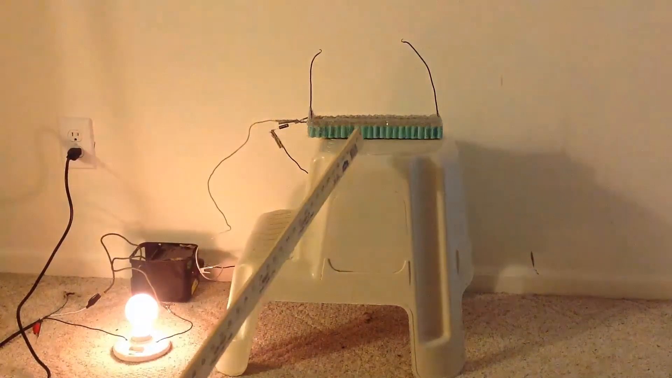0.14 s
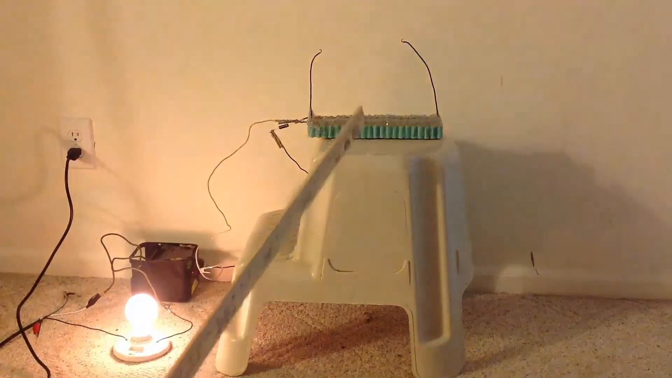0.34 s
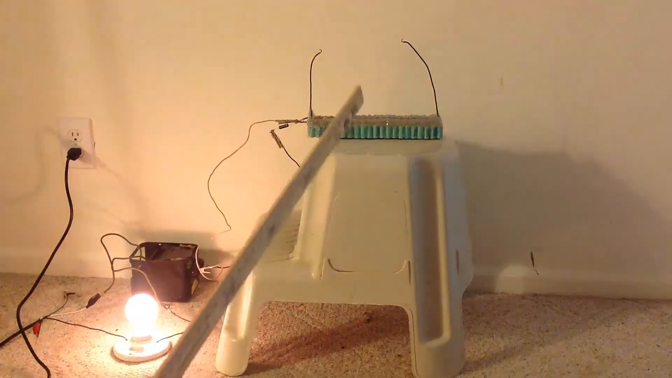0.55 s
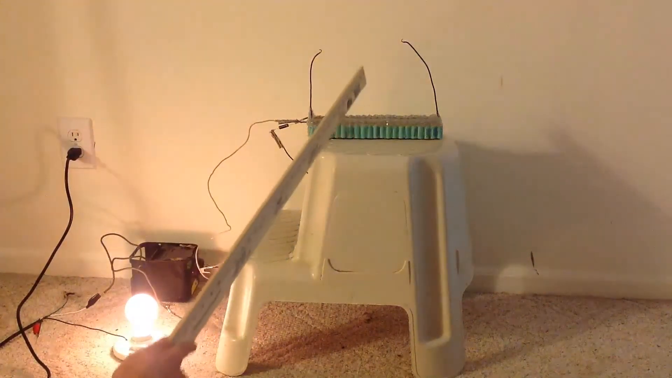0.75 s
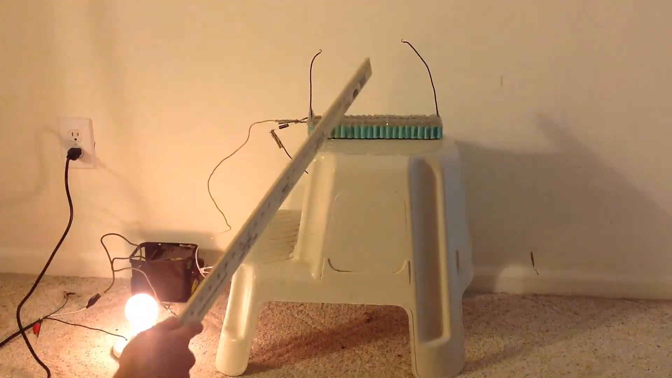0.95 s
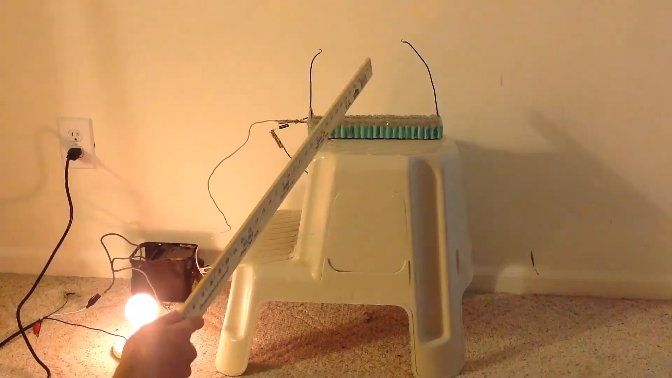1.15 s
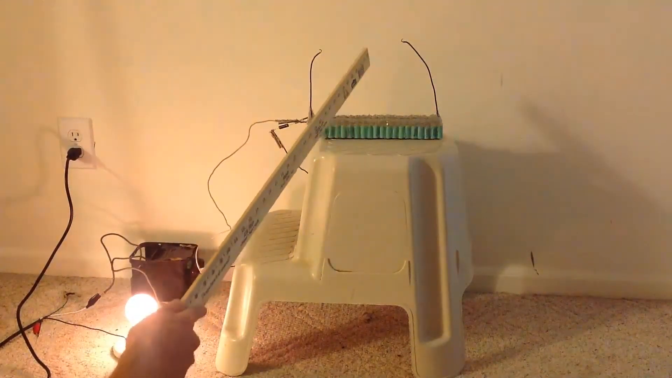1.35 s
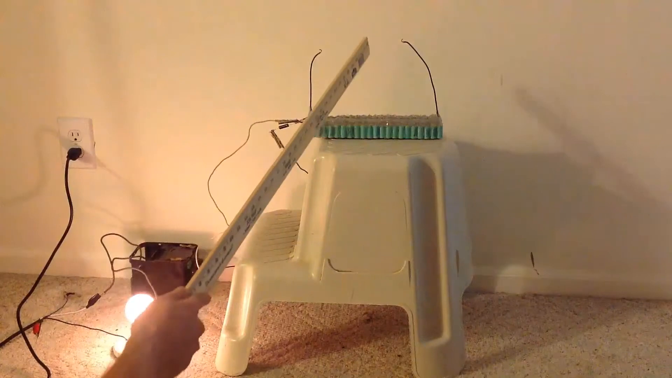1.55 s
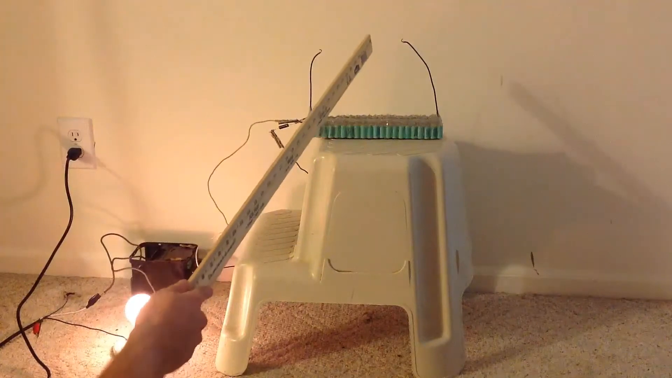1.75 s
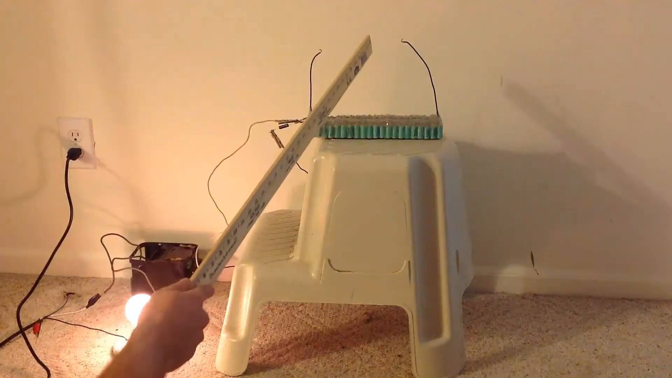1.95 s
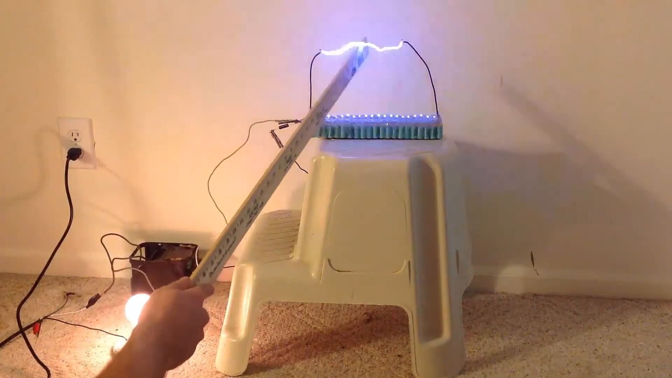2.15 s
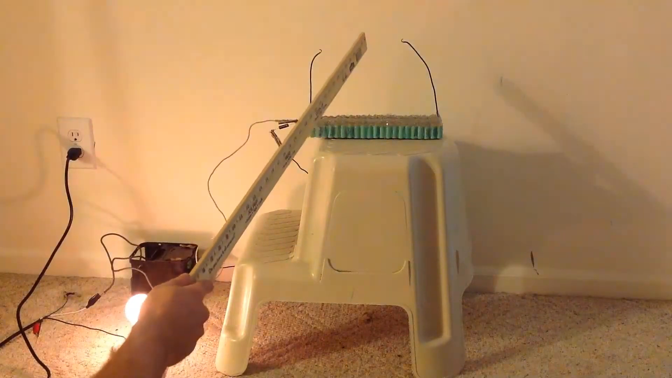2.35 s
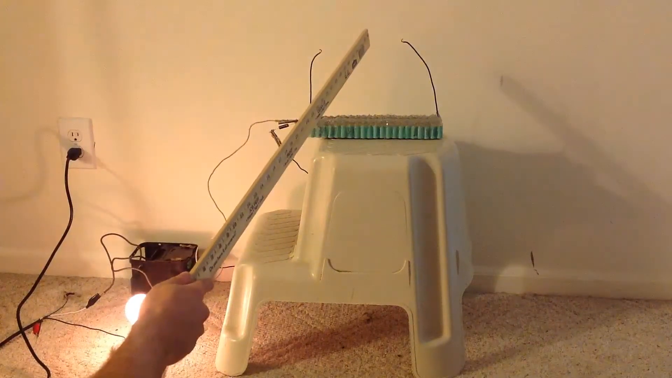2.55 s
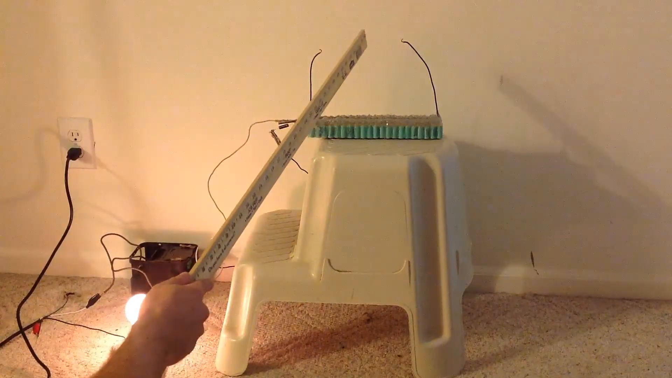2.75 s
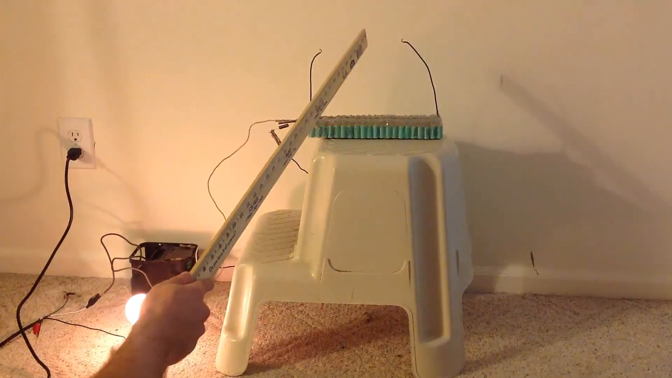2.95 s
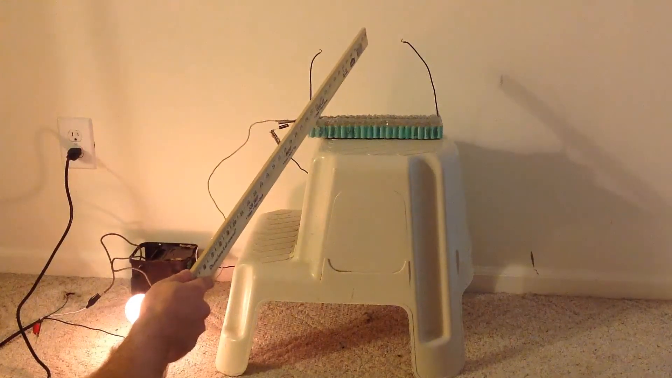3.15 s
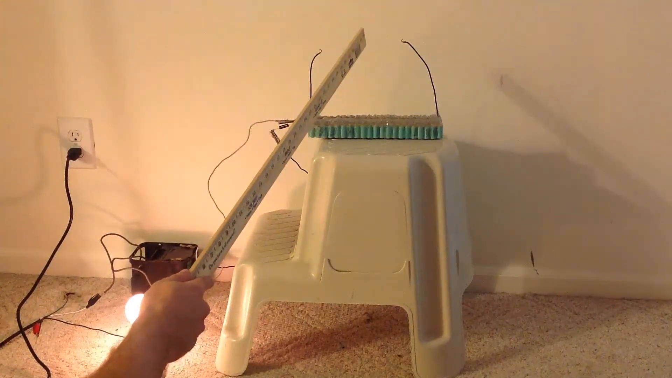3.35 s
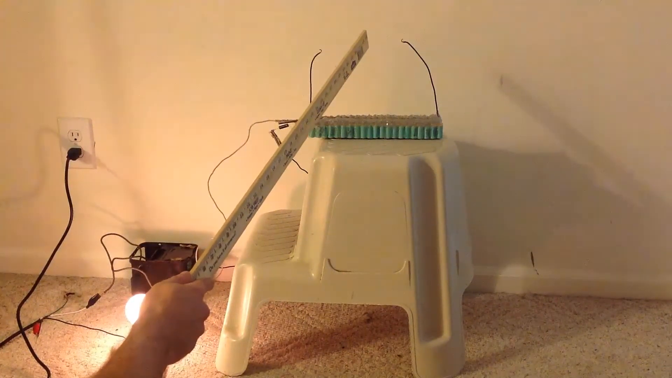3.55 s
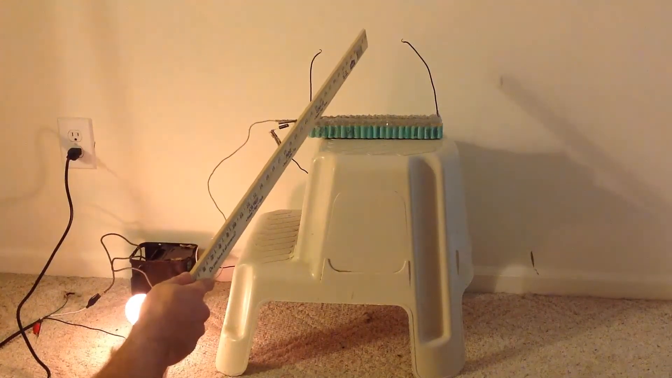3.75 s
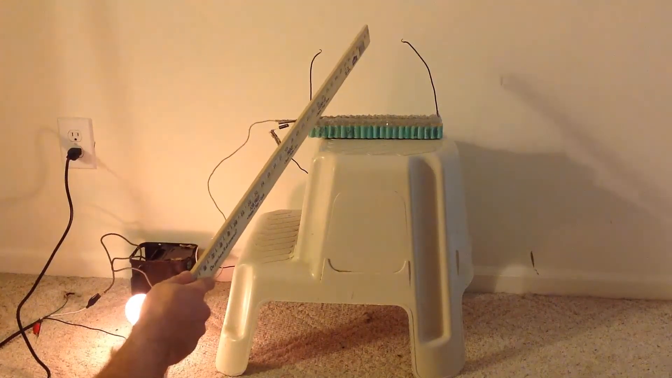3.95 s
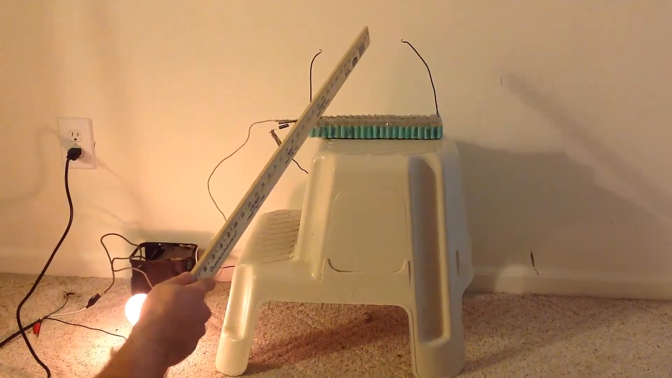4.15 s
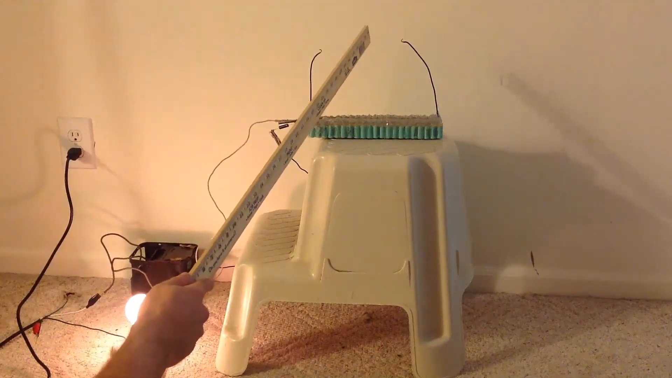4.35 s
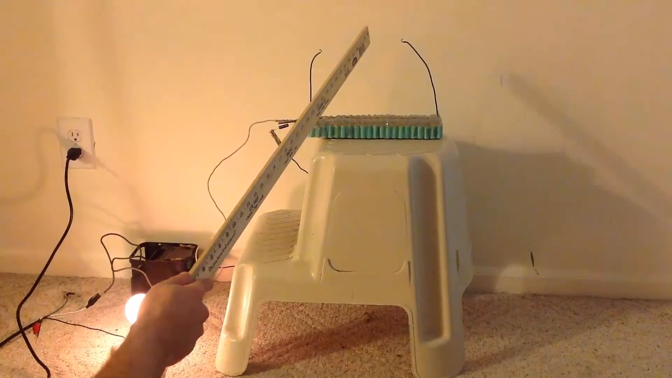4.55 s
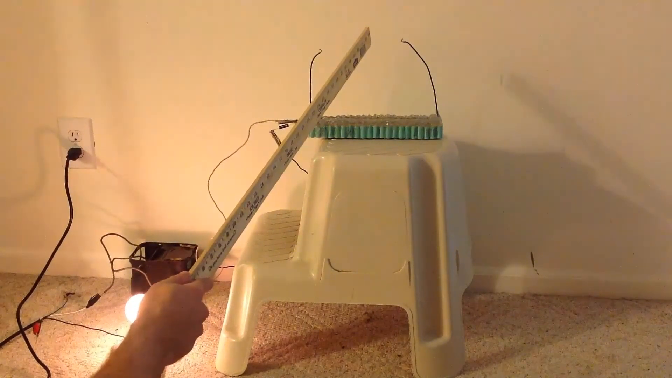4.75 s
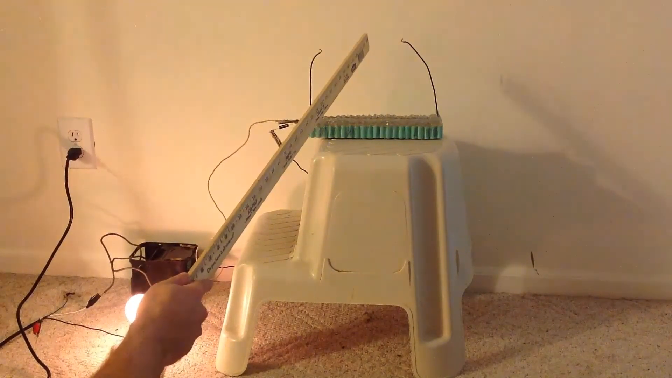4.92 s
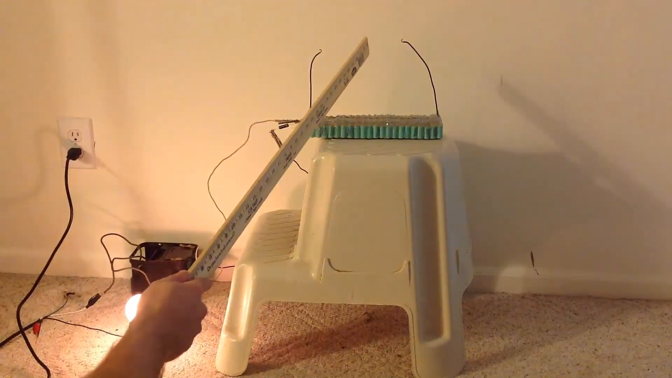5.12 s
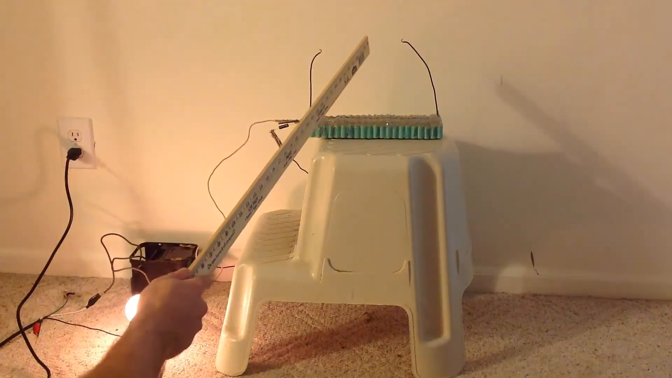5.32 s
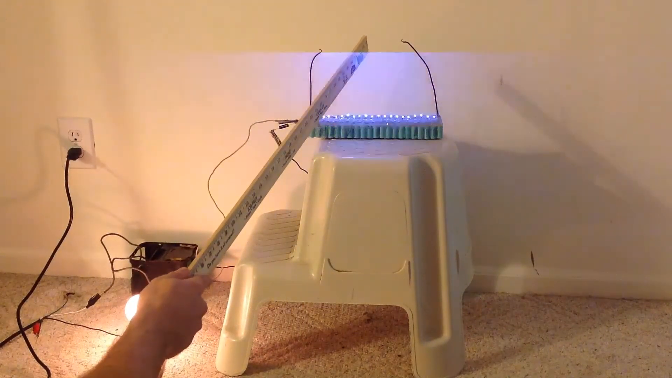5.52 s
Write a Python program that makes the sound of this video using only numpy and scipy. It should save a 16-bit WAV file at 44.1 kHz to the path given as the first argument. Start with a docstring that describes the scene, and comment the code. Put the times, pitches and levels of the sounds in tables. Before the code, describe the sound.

A homemade high-voltage generator fires five loud, sharp spark cracks across an air gap, about one a second. Each overloads a small microphone with a thump and leaves quick echoes and a short, bright tail in a small hard-walled room. Faint mains hum and hiss lie underneath, dipping after every crack and creeping back. Something creaks very faintly between the first two cracks.

```python
"""A home-made high-voltage generator sparks across its air gap in a small hard-walled room.
First one spark's tail dies into mains hum and room noise; then the gap fires about once a second.
Each shock overloads a small microphone into a thump, returns from the walls as sharp echoes and
decays as a bright tail, while gain control ducks the background and slowly releases it.
Between the first two cracks something creaks faintly, once."""
import sys
import numpy as np
from scipy import signal
from scipy.fft import rfft, irfft
from scipy.io import wavfile
from scipy.ndimage import uniform_filter1d

SR = 44100
rng = np.random.default_rng(int(sys.argv[2]) if len(sys.argv) > 2 else 0)


def wav_out(sig):
    """Save sig, one row per channel (or a flat mono array), as 16-bit PCM at SR to the path in sys.argv[1]."""
    wavfile.write(sys.argv[1], SR, np.round(np.clip(np.atleast_2d(sig).T, -1, 1) * 32767).astype(np.int16))


N = 250488
TIME = np.arange(N) / SR

# Levels in all tables are relative.
# discharges: (time [s], strength [dB], push of the echoes [dB], direct slap [dB], reverberation [dB])
DISCHARGES = [(-0.1095, 9, 3, -18, 0), (1.0576, 2, 0.5, -9, 0), (2.1939, -1.5, -2.5, -14.5, 1.4),
              (3.31, 10, 1, 3.5, -.5), (4.5103, 7, 3.5, 0.5, 0.8), (5.596, 2, -8, 10, -1)]
# reflections from the near walls: (delay [s])
NEAR_WALL_DELAYS = [.0064, .0104, .021]
# clearest reflections from the far walls: (delay [s])
FAR_WALL_DELAYS = [.038, .061, .158, .1695]
# spectrum of the diffuse tail: (frequency [Hz], spectral level [dB])
TAIL_SPECTRUM = [(100, -19), (200, -3.5), (400, -4), (800, -8.5), (1300, -7), (2500, -2), (4000, -3),
                 (7000, 0.5), (11000, 5), (15000, 3.5)]
# reverberation time of the room: (frequency [Hz], time to fall 60 dB [s])
ROOM_T60 = [(150, 0.14), (550, 0.27), (850, 0.47), (2500, 0.45), (4500, 0.55), (8000, 0.44), (11000, 0.35),
            (14000, 0.3)]
# resonances that stand out of the tail: (frequency [Hz], level [dB])
ROOM_MODES = [(802, -37.5), (847, -38.5), (971, -43.5), (1437, -43), (1601, -38.5), (2333, -42),
              (2780, -37), (3014, -39), (3469, -41.5), (3636, -32), (4250, -34.5), (4546, -34), (4789, -37),
              (5300, -32.5), (5797, -35.5), (6867, -34.5), (7193, -37.5)]
# swells of the creak's low note: (start time [s], level [dB])
CREAK_SWELLS = [(1.632, -45), (1.684, -42.5)]
# modes of the creak's rasp: (frequency [Hz], level [dB], time to fall 60 dB [s])
RASP_MODES = [(3110, 19, 0.014), (3840, 9, 0.041), (3900, 0, .03)]
# spectral lines of the mains and a small motor: (frequency [Hz], level [dB])
HUM_LINES = [(96.9, -77), (242.2, -63.5), (279.9, -76.5), (360.7, -70.5), (457.6, -85), (554.5, -66.5),
             (646.0, -68), (834.4, -69), (952.8, -73.5), (1114, -70), (1389, -78)]
# room noise and microphone hiss: (frequency [Hz], spectral level [dB])
NOISE_SPECTRUM = [(40, -30.5), (70, -14), (110, -8.5), (160, -2.5), (250, -2), (420, -7.5), (640, -6),
                  (780, -9.5), (1200, -12), (1800, -13.5), (4000, -18), (8000, -21.5), (15000, -22)]


def sparks(shared_power=0.63, crack_db=9.5, thump_db=9, tail_db=-1.5, ring_db=4):
    """Superposition of shock, overload and room response; fixed geometry makes the tails largely alike."""
    t, out = np.arange(int(.7 * SR)) / SR, np.zeros(N)
    common, *own_tails = [diffuse_tail(t) for _ in range(len(DISCHARGES) + 1)]
    direct_slap = from_db(-2) * slap(t, start_hz=850, end_hz=270, glide_s=.0016, decay_s=.0026)
    wall_slap = from_db(-1.5) * slap(t, start_hz=2000, end_hz=320, glide_s=.0005, decay_s=.0012)
    far = far_paths()
    for (s, strength_db, echo_db, slap_db, reverb_db), own in zip(DISCHARGES, own_tails):
        crack = shocks(t, near_paths(), decay_s=.00042, low_hz=503, high_hz=18100)
        crack *= from_db(crack_db + .49 * strength_db)  # grows more slowly than the thump
        low = from_db(thump_db + strength_db) * thump(t, echo_db)
        # the shape of each spark channel changes part of the tail
        tail = np.sqrt(shared_power) * common + np.sqrt(1 - shared_power) * own
        room = from_db(tail_db) * surface_comb(tail) + from_db(ring_db) * room_ringing(t)
        ticks = shocks(t, far, decay_s=.0002, low_hz=5000, high_hz=11000)  # far echoes return thin
        add(out, s, crack + low + from_db(slap_db) * direct_slap + from_db(reverb_db) * room + ticks)
        add(out, s + NEAR_WALL_DELAYS[0], from_db(1.4 * echo_db) * wall_slap)
    return out


def shocks(t, paths, decay_s, low_hz, high_hz):
    """Multipath propagation: the crooked spark channel sends a short, ragged shock along each path."""
    out, short = np.zeros(len(t)), t[:128]
    for delay, db in paths:
        shock = rng.standard_normal(len(short)) * np.exp(-short / decay_s)
        shock = butter(butter(shock, low_hz, "high", order=1), high_hz, "low")
        add(out, delay, from_db(db) * shock / np.linalg.norm(shock))
    return out


def thump(t, echo_db, recover_s=.00044, bright_hz=1200, coupling_hz=135, leak_db=-23.5):
    """High-pass transient: shocks push the microphone off centre and its bass cut swings it back."""
    pushes = np.zeros(len(t))
    for delay, db in wall_paths():
        push_db = 1.2 * db + (echo_db if delay else 0)  # overload grows faster than the arrival
        add(pushes, delay, from_db(push_db) * np.exp(-t / recover_s))
    pushes = butter(pushes, bright_hz, "low", order=1)
    return butter(pushes, coupling_hz, "high", order=6) + from_db(leak_db) * pushes


def slap(t, start_hz, end_hz, glide_s, decay_s):
    """Damped oscillation: the overloaded microphone swings a cycle or two, slower as it recovers."""
    hz = end_hz + (start_hz - end_hz) * np.exp(-t / glide_s)
    return np.cos(2 * np.pi * np.cumsum(hz) / SR) * np.exp(-t / decay_s)


def wall_paths(distance_m=2, sound_m_per_s=343):
    """Spherical spreading: direct and wall paths weaken as 1 / distance; (delay [s], level [dB])."""
    delays = [0, *NEAR_WALL_DELAYS]
    return [(delay, -20 * np.log10(1 + delay * sound_m_per_s / distance_m)) for delay in delays]


def near_paths(level_db=14, bounce_s=.0014, bounce_db=-4):
    """Image source: a surface right by the gap doubles every arrival; (delay [s], level [dB])."""
    pair = [(0, level_db), (bounce_s, level_db + bounce_db)]
    return [(delay + lag, db + pair_db) for delay, db in wall_paths() for lag, pair_db in pair]


def far_paths(level_db=10.5, loss_db_per_s=79, stray_db=-5.5):
    """Propagation loss: clear and stray far echoes weaken with delay; (delay [s], level [dB])."""
    clear = [(delay, 0) for delay in FAR_WALL_DELAYS]
    stray = [(delay, stray_db) for delay in rng.uniform(.062, .24, 5)]
    return [(delay, level_db + db - loss_db_per_s * delay) for delay, db in clear + stray]


def diffuse_tail(t, grain_db=3, build_s=.008):
    """Reverberation: countless uneven reflections build up, then each band decays at its own rate."""
    edges_hz = np.geomspace(80, 17000, 21)
    reflections = rng.standard_normal((2, len(t)))
    reflections *= from_db(grain_db * rng.standard_normal(len(t) // 8 + 1)).repeat(8)[:len(t)]
    undamped, tail = 0, 0
    for k, (low, high) in enumerate(zip(edges_hz, edges_hz[1:])):
        hz = np.sqrt(low * high)
        band = from_db(at_hz(TAIL_SPECTRUM, hz)) * butter(reflections[k % 2], [low, high], "band")
        undamped += band
        tail += band * from_db(-60 * t / at_hz(ROOM_T60, hz))
    return tail / np.std(undamped) * (1 - np.exp(-t / build_s))


def surface_comb(tail, reflection=.092):
    """Comb filtering: the stool and the wall behind the gap mirror the spark into spectral ripples."""
    mirrors = np.zeros(SR // 50)
    mirrors[0] = 1
    for delay, _ in near_paths()[1:4]:
        mirrors[round(delay * SR)] += reflection
    return signal.fftconvolve(tail, mirrors / np.linalg.norm(mirrors))[:len(tail)]


def room_ringing(t, scatter_db=6, spread_hz=20):
    """Beating: each resonance is three close, decaying modes that every spark excites differently."""
    out = np.zeros(len(t))
    for centre_hz, db in ROOM_MODES:
        hz = centre_hz + spread_hz * rng.uniform(-1, 1, (3, 1))
        size, phase = from_db(scatter_db * rng.standard_normal(hz.shape)), rng.random(hz.shape)
        cluster = (size * np.sin(2 * np.pi * (hz * t + phase))).sum(axis=0) / np.sqrt(len(hz))
        out += cluster * from_db(db - 60 * t / at_hz(ROOM_T60, centre_hz))
    return out


def creak(note_hz=330, slips_per_s=250, rasp_at_s=1.677, rasp_width_s=.02, rasp_db=-67):
    """Stick-slip excitation: a brief run of slips rings three high modes over a soft low note."""
    envelope = sum(from_db(db) * swell(s, rise_s=.014) for s, db in CREAK_SWELLS)
    note = envelope * np.sin(2 * np.pi * note_hz * TIME + drift(60))
    slip_rate = slips_per_s * from_db(2 * drift(90))
    slips = np.diff(np.floor(np.cumsum(slip_rate) / SR), prepend=0)  # one impulse per slip
    slips *= np.exp(-((TIME - rasp_at_s) / rasp_width_s) ** 2)
    t = TIME[:SR // 10]
    body = sum(from_db(db - 60 * t / t60) * np.sin(2 * np.pi * hz * t) for hz, db, t60 in RASP_MODES)
    return note + from_db(rasp_db) * signal.fftconvolve(slips, body)[:N]


def hum(gain_db=2.5, waver_rad=.5):
    """Line spectrum: the mains and a small motor give tones that waver slightly in level and phase."""
    out = np.zeros(N)
    for hz, db in HUM_LINES:
        amplitude = np.sqrt(2) * from_db(gain_db + db + drift(15))
        out += amplitude * np.sin(2 * np.pi * (hz * TIME + rng.random()) + waver_rad * drift(16))
    return out


def room_noise(level_db=-52.5, bass_cut_hz=85):
    """Stationary noise: room sound and microphone hiss form a continuous spectrum without deep bass."""
    hz = np.maximum(np.arange(N // 2 + 1) * SR / N, 1)
    spectrum = rfft(rng.standard_normal(N)) * from_db(at_hz(NOISE_SPECTRUM, hz))
    noise = butter(irfft(spectrum, N), bass_cut_hz, "high")
    return from_db(level_db) * noise / np.sqrt(np.mean(noise ** 2))


def gain_control(x, threshold_db=-36, depth_db=8.5, release_db_per_s=7.5, attack_s=.013):
    """Compression: loud sound quickly lowers the gain by a limited amount; it creeps back up."""
    power = uniform_filter1d(x[0] ** 2, size=220, origin=109)  # mean of the past 5 ms
    level_db = 10 * np.log10(np.maximum(power, 1e-12))
    wanted_db = np.clip(level_db - threshold_db, 0, depth_db)
    release_db = release_db_per_s * TIME
    held_db = np.maximum.accumulate(wanted_db + release_db) - release_db
    pole = np.exp(-1 / (attack_s * SR))
    cut_db, _ = signal.lfilter([1 - pole], [1, -pole], held_db, zi=[pole * held_db[0]])
    return x * from_db(-cut_db)


def swell(s, rise_s):
    """Critically damped envelope: rises from time s to 1, then dies away."""
    age = np.maximum(TIME - s, 0) / rise_s
    return age * np.exp(1 - age)


def drift(rate_hz):
    """Random modulation: a slow wander with a spread of about 1."""
    return np.interp(TIME * rate_hz, np.arange(400), rng.standard_normal(400))


def from_db(db):
    """Decibel law: level to amplitude ratio."""
    return 10 ** (np.asarray(db) / 20)


def at_hz(points, hz):
    """Interpolation of a table on a log-frequency axis."""
    table = np.array(points)
    return np.interp(np.log(hz), np.log(table[:, 0]), table[:, 1])


def butter(x, hz, kind, order=2):
    """Causal Butterworth filtering."""
    return signal.sosfilt(signal.butter(order, hz, kind, fs=SR, output="sos"), x + 1e-18)


def add(track, s, sound):
    """Superposition of a sound on a track at time s; what falls outside is dropped."""
    at = int(round(s * SR))
    first, last = max(at, 0), min(at + len(sound), len(track))
    if last > first:
        track[first:last] += sound[first - at:last - at]


def scene():
    """Superposition of the sparks and the quiet room in one channel."""
    return (sparks() + hum() + room_noise() + creak())[None]


def record(dry, cutoff_hz=15350, ceiling=.86):
    """Compression, then hard clipping between two steep low-pass filters."""
    top_cut = signal.ellip(10, .2, 85, cutoff_hz, fs=SR, output="sos")
    ducked = gain_control(dry)
    clipped = np.clip(signal.sosfilt(top_cut, ducked), -ceiling, ceiling)
    return signal.sosfilt(top_cut, clipped)


dry = scene()
out = record(dry)
wav_out(out)
```